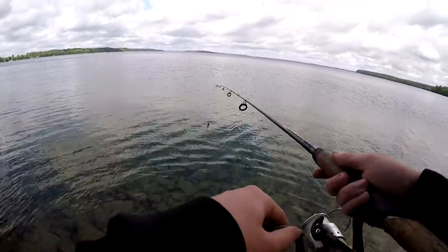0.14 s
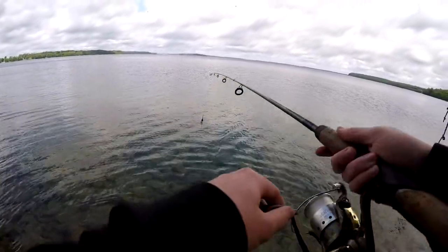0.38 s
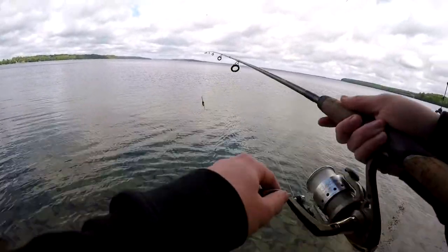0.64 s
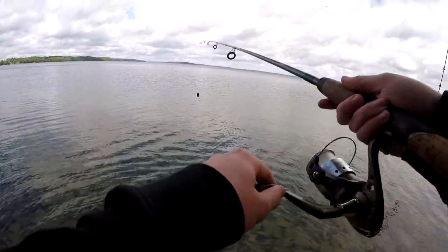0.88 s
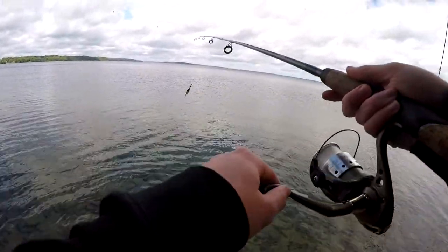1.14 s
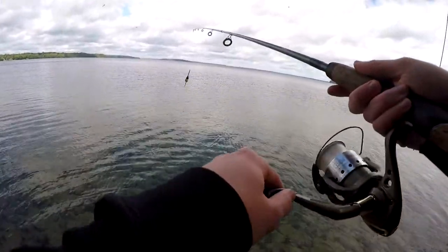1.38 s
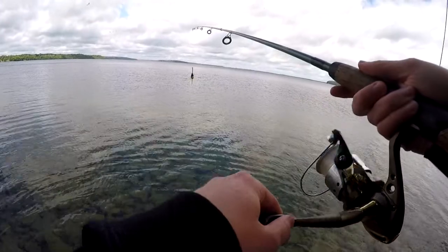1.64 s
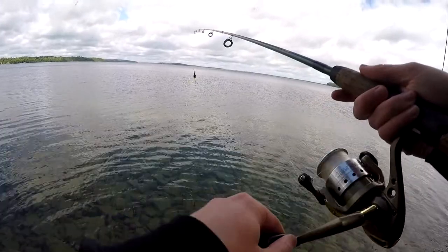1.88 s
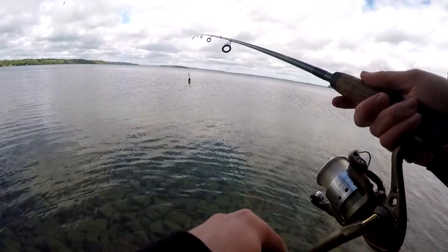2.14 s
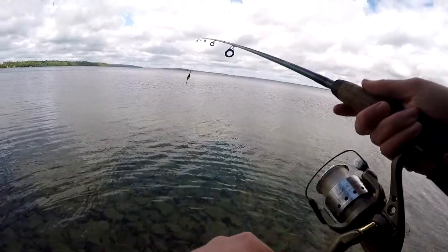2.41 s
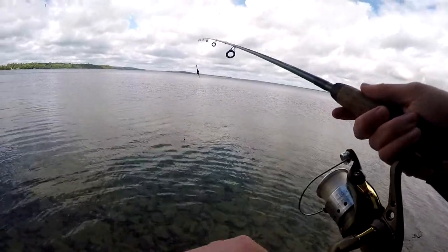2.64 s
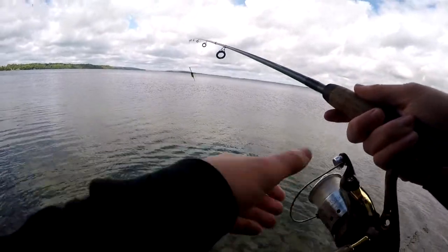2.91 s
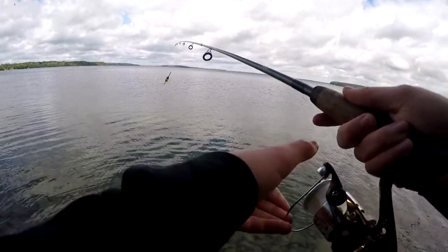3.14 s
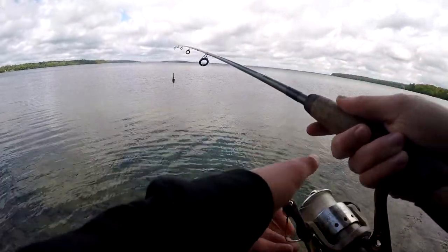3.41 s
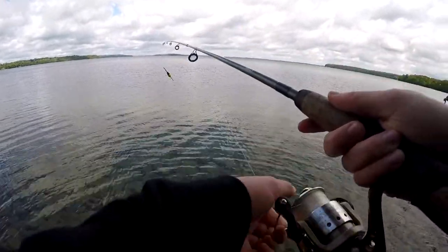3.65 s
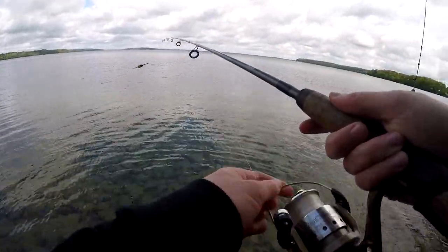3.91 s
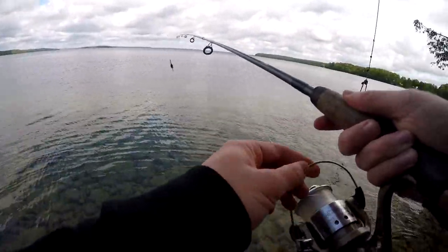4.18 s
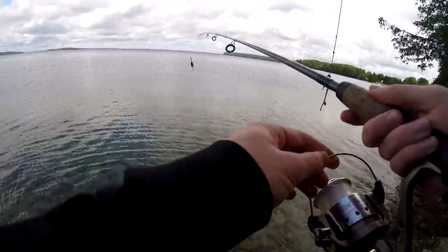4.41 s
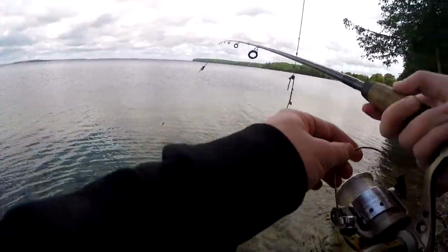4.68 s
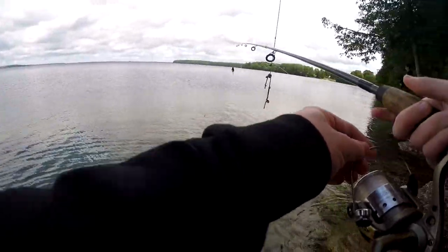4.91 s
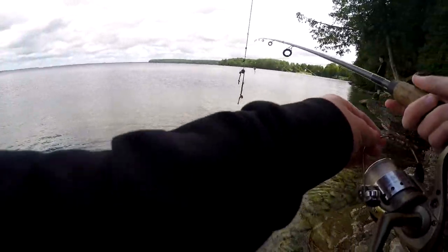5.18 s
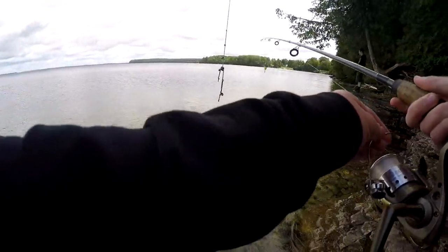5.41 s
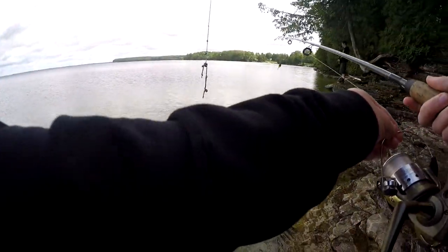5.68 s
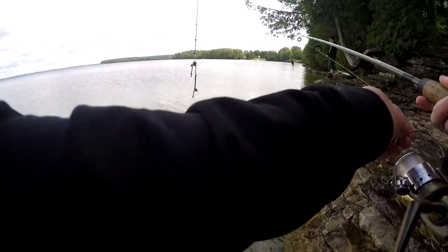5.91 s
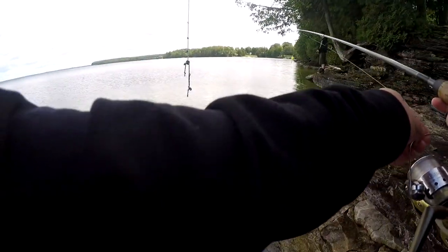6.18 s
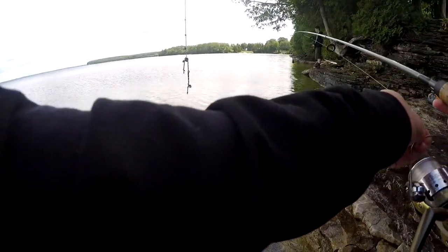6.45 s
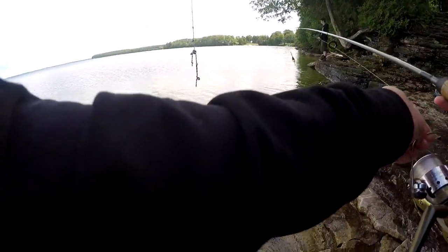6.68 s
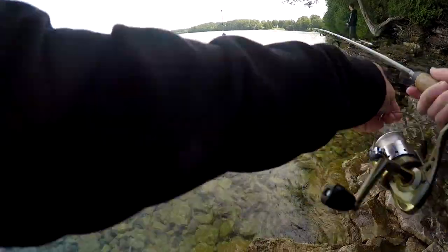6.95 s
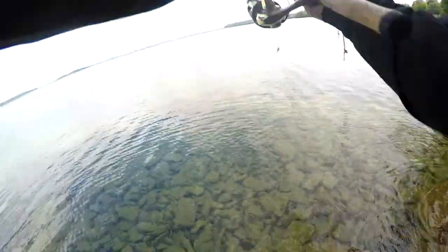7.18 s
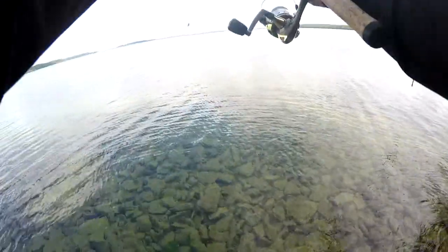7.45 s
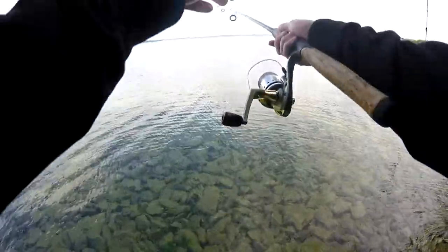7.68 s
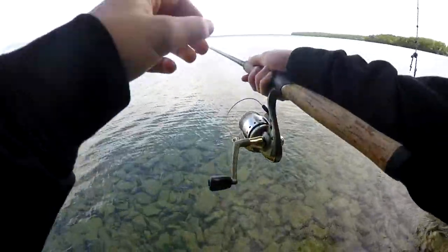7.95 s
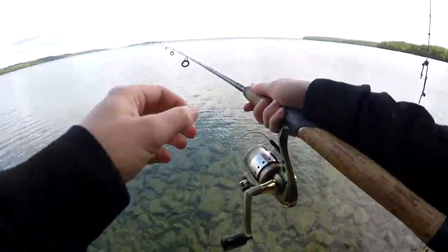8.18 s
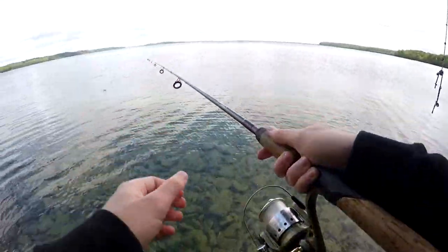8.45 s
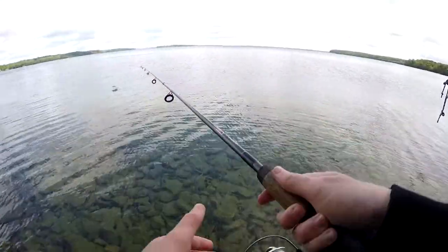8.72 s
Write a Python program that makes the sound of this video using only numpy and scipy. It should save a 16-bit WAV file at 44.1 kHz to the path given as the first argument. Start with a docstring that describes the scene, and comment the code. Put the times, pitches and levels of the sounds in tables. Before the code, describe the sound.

Outdoors at a calm lake shore, but very close and boxy, in mono, from a sealed case on the angler's chest. Steady low hiss and a deep heartbeat, about two beats a second, run underneath throughout. From 0 to 2.4 s winding gives only faint cloth rub and sparse hollow ticks, one clear at 0.3 s. Around 2.5 to 3.7 s knocks cluster and sleeves scrape softly; a tiny thin wire click comes at 4.3 s. Grainy rustling swells from 5 to 5.9 s with many ticks, then eases by 6.5 s. At 7.1 to 7.35 s the cast bursts out: loud smooth swish, deep thump, bright thin clicks, strap shuffle and low sway. Rustling continues in waves, with a dull bump at 7.9 s and two hollow knocks near 8.2 s, then settles into softer rubbing until the end near 9 s.

```python
"""A quiet lake shore: an angler winds in, opens the reel, swings back and casts, heard from a sealed case
on the chest. Sleeves and straps rub it: hiss, puffs and snaps that make its walls ring as damped modes.
Fast sleeves add a swish of coloured noise; knocks ring the walls, thin clicks and dull bumps stand apart.
The harness shuffles and sways as low noise, strongest around the cast. The wearer's heart thuds
underneath as sinking low tones, over the steady hiss of the recorder."""
import sys
import numpy as np
from scipy import signal
from scipy.fft import rfft, irfft, next_fast_len
from scipy.io import wavfile
from scipy.ndimage import uniform_filter1d

SR = 44100
rng = np.random.default_rng(int(sys.argv[2]) if len(sys.argv) > 2 else 0)


def persist_wave(psi):
    """Save psi, clipped to +-1, as 16-bit WAV."""
    counts = np.round(np.clip(psi, -1, 1) * 32767).astype(np.int16)
    wavfile.write(sys.argv[1], SR, np.atleast_2d(counts).T)


def volts_from_db(level):
    """Convert decibel levels to linear amplitude ratios."""
    exponent = np.asarray(level, float) / 20
    return 10 ** exponent


N = 389403  # length in samples

FAST_DB = -42  # cloth level of a fast arm movement, the reference for swish and shuffle


def evened(x):
    """Brings a signal to an rms of 1."""
    return x / np.sqrt(np.mean(x ** 2) + 1e-20)


def add(mix, s, sound):
    """Lays a sound into the mix from s seconds on, cut off at the end."""
    part = mix[round(s * SR):][:len(sound)]
    part += sound[:len(part)]


def coloured(x, points):
    """Filters x by a table of (f/Hz, level/dB), joined along a log frequency axis."""
    size = next_fast_len(len(x))
    f, db = np.transpose(points)
    hz = np.fft.rfftfreq(size, 1 / SR)
    gain_db = np.interp(np.log(hz + 1), np.log(f + 1), db)
    return irfft(rfft(x, size) * volts_from_db(gain_db), size)[:len(x)]


def ring(x, hz, width):
    """One damped mode with steep flanks, from a doubled pole; gain 1 at its centre."""
    r = np.exp(-np.pi * width / SR)
    pole = [1, -r * np.exp(2j * np.pi * hz / SR)]
    return 2 * signal.lfilter([(1 - r) ** 2], np.convolve(pole, pole), x).imag


def walls(drive, favour_db):
    """The case answers a force with all its modes; favour_db weights a mode by its octave above 1 kHz."""
    # ringing modes of the case walls: (f/Hz, width/Hz, level/dB)
    modes = [(515.5, 146, -5.5), (656, 227, -3), (1020, 386, 1.5), (1202, 380, 2), (1683, 330, -7),
             (2043, 310, -2), (2303, 343, 2), (3117, 440, -5), (3515, 204, -9.5), (3837, 386, -6),
             (4390, 630, -12), (5300, 510, -13.5), (6020, 940, -16.5), (6800, 720, -24), (7700, 900, -30.5),
             (10500, 880, -31), (12700, 2000, -36)]
    out = 0
    for k, (hz, width, db) in enumerate(modes):
        sign = (-1) ** k  # neighbouring modes in opposite polarity
        force = drive * volts_from_db(db + favour_db(np.log2(hz / 1000)))
        out = out + sign * ring(force, hz, width)
    return out


def swells(s, rise, fall, db):
    """Power over time of each movement, every 64 samples: up to its peak and away again."""
    s, rise, fall, db = (np.asarray(v)[:, None] for v in (s, rise, fall, db))
    lag = np.arange(0, N + 64, 64) / SR - s
    ends_db, squareness = -9, 1.48  # level one rise or fall from the peak; flatness of the top
    return volts_from_db(db + ends_db * abs(lag / np.where(lag < 0, rise, fall)) ** squareness) ** 2


def every_sample(x):
    """Joins values 64 samples apart by straight lines."""
    return np.interp(np.arange(N), np.arange(len(x)) * 64, x)


def movement():
    """Level and brightness of the cloth: the strokes add up in power over the resting level."""
    # arm movements that drag cloth over the case, brightness as a tilt:
    # (peak t/s, rise/s, fall/s, peak level/dB, brightness/dB per octave)
    strokes = [(0.42, 0.23, 0.33, -67, -0.5), (0.78, .1, 0.14, -68.5, -1.5), (1.2, .2, .12, -75, 4),
               (1.74, .2, .3, -69, -1), (2.33, 0.19, .07, -66, 0), (2.51, 0.14, 0.11, -65, -0.5),
               (2.72, 0.13, 0.21, -64.5, 0), (3.13, 0.13, 0.12, -57, -1.5), (3.52, 0.17, 0.14, -59, 0),
               (3.68, 0.051, 0.082, -63.5, -0.5), (3.97, 0.17, 0.51, -66, -1),
               (4.27, 0.067, 0.026, -65.5, 0), (4.4, 0.06, 0.092, -71, 1), (4.87, 0.32, 0.09, -65.5, 1),
               (5.1, 0.16, 0.23, -57, 0), (5.34, 0.22, 0.11, -50.5, 0.5), (5.52, 0.075, .13, -51, 0),
               (5.73, 0.13, .06, -53.5, 0), (5.87, 0.1, 0.14, -53.5, 0), (6.17, 0.11, 0.18, -58.5, 0.5),
               (6.33, 0.15, 0.19, -60.5, 0), (6.9, 0.13, 0.45, -58, -0.5), (7.189, 0.11, 0.094, -42, -0.5),
               (7.298, 0.08, 0.041, -41, -2.5), (7.45, 0.05, 0.066, -50, .5),
               (7.55, 0.093, 0.13, -45.5, 0.5), (7.71, 0.15, 0.034, -48, 0.5),
               (7.849, 0.072, 0.039, -47.5, 1), (7.96, 0.13, 0.12, -54.5, -.5),
               (8.12, 0.11, 0.16, -54.5, -1.5), (8.33, 0.29, 0.18, -52.5, -0.5),
               (8.54, 0.074, 0.062, -54, -0.5), (8.82, 0.26, .1, -55, 0)]
    still_db = -75
    s, rise, fall, db, bright = np.transpose(strokes)
    power = swells(s, rise, fall, db)
    total = power.sum(0) + volts_from_db(still_db) ** 2
    return every_sample(10 * np.log10(total)), every_sample(bright @ power / total)


def nudges(rows, under_db):
    """Short even swells added in power to a running level."""
    s, half, db = np.transpose(rows)
    power = every_sample(swells(s, half, half, db).sum(0))
    return 10 * np.log10(power + volts_from_db(under_db) ** 2)


def rub(catches_per_s=200, catch_s=0.0077, catch_db=-2, snaps_per_s=220, spread_db=4.0, snap_db=-3,
        smooth_above_db=-44):
    """Fibres slide with a hiss, catch in short puffs and snap free; fast sliding evens this out."""
    level_db, brightness = movement()
    catches = 1. * (rng.random(N) < catches_per_s / SR)
    puffs = signal.lfilter([1], [1, -np.exp(-1 / (catch_s * SR))], catches)
    snap_size = volts_from_db(spread_db * np.minimum(rng.exponential(1, N), 3))
    snaps = snap_size * (rng.random(N) < snaps_per_s / SR)
    grainy = 1 / (1 + volts_from_db(level_db - smooth_above_db) ** 2)
    hiss = rng.standard_normal(N) * (1 + grainy * volts_from_db(catch_db) * evened(puffs))
    hiss /= np.sqrt(uniform_filter1d(hiss ** 2, SR // 4))  # steady over a quarter second
    force = hiss + grainy * volts_from_db(snap_db) * evened(snaps)
    scale = np.sqrt(np.mean(walls(force, lambda octave: 0) ** 2))
    tilt = np.clip(brightness, -3, 3)  # dB per octave, pivoting at 2 kHz
    return walls(force * volts_from_db(level_db), lambda octave: tilt * (octave - 1)) / scale


def swish():
    """Sleeves sweeping past fast give a fuller, smoother rush than the slow rubbing."""
    # spectrum of the rush: (f/Hz, level per Hz/dB)
    swish_tone = [(250, -24), (400, 0), (700, -4), (1400, 0), (2700, -8.5), (4300, -6.5), (4900, -18.5),
                  (5500, -5.5), (6800, -17), (7300, -25), (12000, -45), (15000, -40)]
    # -47.5 dB at the fast level, growing 2 dB per dB of cloth level
    level_db = -47.5 + 2 * (movement()[0] - FAST_DB)
    return volts_from_db(level_db) * evened(coloured(rng.standard_normal(N), swish_tone))


def knocks(grit_s=0.0056, small_count=260, small_over_cloth_db=2.5, small_spread_db=6.5):
    """Each knock is a push and a little grit; where it lands decides which modes ring."""
    # single knocks on the case: (peak t/s, peak level/dB, favoured octave above 1 kHz, spread/octaves)
    single_knocks = [(0.0287, -51, 0, 1.5), (0.0755, -56, 2.1, 0.3), (0.3134, -50, 0.4, 3),
                     (0.3286, -40, 1.3, 1.4), (0.4059, -52, 1.1, 1.5), (0.4276, -55, 0.7, 0.3),
                     (0.6619, -53, 0.4, 2), (0.7704, -45, 1.3, 2), (1.8145, -50, 0.6, 1.3),
                     (2.0171, -48, -0.6, 3), (2.2294, -51, 1.8, 0.6), (2.4508, -50, 1.0, 2),
                     (2.5018, -45, 1.6, 0.9), (2.515, -44, 1.4, 1.3), (2.5541, -40, 0.4, 0.9),
                     (2.6165, -46, 0.2, 1.3), (2.6992, -38, -0.6, 1.1), (3.0625, -36, 0, 0.9),
                     (3.1461, -46, -0.8, 2), (3.1653, -48, 0.6, 3), (3.5197, -43, 0.8, 0.9),
                     (3.5289, -46, 0.4, 2), (3.6775, -43, 1.2, 3), (3.6861, -44, 0, 3),
                     (4.3247, -48, 0.4, 0.9), (4.5164, -47, -0.8, 1.4), (5.2755, -39, 1.2, 1.3),
                     (5.3449, -41, 1.4, 1), (5.4598, -42, 1.0, 1.3), (5.577, -41, 1.2, .9),
                     (5.6165, -39, 1.4, 2), (5.8082, -38.5, 1.2, 0.9), (6.1365, -40.5, 0.6, 1.3),
                     (6.1595, -46, 0.8, 3), (6.1837, -42, 0.2, 2), (6.3, -39, 0.6, 1.3),
                     (6.366, -42, 1.0, 1.3), (7.3564, -43, 1.4, 0.9), (7.4222, -46, 2.0, 0.9),
                     (8.2143, -38, 0.6, 0.9), (8.2621, -37, 0.4, 1.3)]
    t = np.arange(300) / SR
    # scattered ticks, a little louder than the cloth and rising with it
    when, size, place, width = rng.random((small_count, 4)).T
    at = .02 + when * (N / SR - .1)
    cloth_db = movement()[0][(at * SR).astype(int)]
    small_db = cloth_db + small_over_cloth_db + small_spread_db * size
    rows = single_knocks + list(zip(at, small_db, 2.4 * place, .4 + 1.6 * width))
    rough = rng.standard_normal((len(rows), len(t)))
    out = np.zeros(N)
    for (s, db, centre, octaves), grain in zip(rows, rough):
        push = t == 0
        grit = volts_from_db(-25) * grain * np.exp(-t / grit_s)
        force = np.pad(push + grit, (0, 1500))  # room to ring out
        tick = walls(force, lambda octave: -6 * ((octave - centre) / octaves) ** 2)
        add(out, s - abs(tick).argmax() / SR, volts_from_db(db) * tick / abs(tick).max())
    return out


def snicks():
    """Thin clicks of wire and line through the air: bright noise bursts that bypass the case's ringing."""
    # clicks, each swelling for half its length: (start t/s, peak level/dB, length/s)
    clicks = [(4.2785, -48.5, 0.0022), (4.2834, -53, 0.002), (7.3114, -40, 0.0022), (7.3155, -41, 0.0022),
              (7.354, -44, 0.0018), (7.3624, -63, 0.002)]
    # spectrum of a click: (f/Hz, level/dB)
    click_tone = [(1000, -20), (3500, 10), (4400, 12), (6000, 4), (8500, -1), (12000, 0), (14000, -7)]
    t = np.arange(600) / SR
    out = np.zeros(N)
    for (s, db, length), grain in zip(clicks, rng.standard_normal((len(clicks), len(t)))):
        burst = coloured(grain, click_tone) * t / length * np.exp(1 - 2 * t / length)
        add(out, s, volts_from_db(db) * burst / abs(burst).max())
    return out


def bumps():
    """Dull bumps against the harness: a softly starting sine that dies within a few cycles."""
    # bumps, level before onset and decay: (start t/s, level/dB, f/Hz, 60 dB decay/s)
    dull_bumps = [(0.327, -47, 115, 0.059), (2.693, -42, 82, .05), (4.516, -44, 124, 0.057),
                  (7.269, -21, 24.3, 0.26), (7.883, -27.5, 240, 0.033), (8.265, -32.5, 108, 0.082)]
    t = np.arange(6000) / SR
    out = np.zeros(N)
    for s, db, hz, t60 in dull_bumps:
        onset = 1 - np.exp(-t / 0.0042)
        add(out, s, -volts_from_db(db - 60 * t / t60) * np.sin(2 * np.pi * hz * t) * onset)
    return out


def harness(lump_s=0.059):
    """Low shuffle of the straps, the ring of the mount when shaken hard, and the slow sway."""
    # spectra of shuffle and sway: (f/Hz, level per Hz/dB)
    shuffle_tone = [(35, -6.5), (60, 0), (90, -4.5), (150, -9), (205, -15), (265, -16), (330, -26),
                    (400, -35), (600, -54.5)]
    sway_tone = [(5, -34), (12, 2), (20, -9), (32, -3), (45, -15.5), (65, -22.5), (90, -35), (200, -83)]
    # moments when the low shuffle swells: (peak t/s, half length/s, peak level/dB)
    shuffle_swells = [(0.69, 0.11, -63), (1.7, 0.093, -59), (3.17, 0.078, -55), (3.96, .05, -61),
                      (4.15, 0.044, -58), (4.38, 0.036, -57), (4.52, 0.025, -58), (5.85, 0.31, -57.5),
                      (6.32, 0.032, -52.5), (6.81, 0.047, -60), (6.93, 0.069, -55.5), (7.22, 0.12, -40.5),
                      (7.34, 0.043, -38.5), (7.6, 0.32, -53.5), (7.89, .02, -44), (8.26, 0.061, -55),
                      (8.51, .05, -51.5)]
    # lurches of the case on the chest, during and after the cast: (peak t/s, half length/s, peak level/dB)
    lurches = [(7.16, 0.027, -52), (7.29, 0.072, -33.5), (7.39, 0.084, -30), (7.55, 0.092, -36),
               (7.77, 0.088, -39.5), (7.9, 0.077, -38.5), (8.2, 0.64, -49)]
    # ring of the case on its straps, level against the shuffle at its strongest:
    # (f/Hz, width/Hz, level/dB, extra level/dB per dB of shuffle)
    mount_ring = (123.1, 51, 0.85, 0.36)
    shuffle, shake, sway, lumps = rng.standard_normal((4, N))
    for _ in range(2):
        lumps = uniform_filter1d(lumps, round(lump_s * SR))
    # the harness follows the arms by 0.49 dB per dB, unevenly by 2 dB rms
    follow_db = -51.5 + 0.49 * (movement()[0] - FAST_DB) + 2 * evened(lumps)
    shuffle_db = nudges(shuffle_swells, follow_db)
    hz, width, db, extra = mount_ring
    mount = volts_from_db(db + extra * (shuffle_db - shuffle_db.max())) * evened(ring(shake, hz, width))
    straps = volts_from_db(shuffle_db) * (evened(coloured(shuffle, shuffle_tone)) + mount)
    sway_db = nudges(lurches, -58)  # over the sway at rest
    return straps + volts_from_db(sway_db) * evened(coloured(sway, sway_tone))


def heart(start_hz=42, settle_hz=15, glide_s=0.057, first_s=.16, second_s=.12, second_after_s=.24):
    """Each heart sound is a few cycles of the chest wall, sinking in pitch; the second is shorter."""
    # heartbeats: (start t/s, first sound level/dB, second sound level/dB)
    beats = [(0.124, -42, -49), (0.645, -46, -56), (1.181, -44.5, -47), (1.666, -45.5, -50),
             (2.195, -42.5, -52), (2.701, -41.5, -46.5), (3.213, -46, -50.5), (3.732, -44, -53),
             (4.238, -42.5, -47.5), (4.733, -44, -47.5), (5.242, -46.5, -52), (5.769, -43.5, -46.5),
             (6.277, -43.5, -45.5), (6.786, -43.5, -52), (7.301, -47, -41), (7.814, -44, -44.5),
             (8.345, -42, -45)]
    out = np.zeros(N)
    for s, first_db, second_db in beats:
        for at, db, length in (s, first_db, first_s), (s + second_after_s, second_db, second_s):
            t = np.arange(round(length * SR)) / SR
            pitch = settle_hz + (start_hz - settle_hz) * np.exp(-t / glide_s)
            shape = np.sin(np.pi * (t / length) ** 0.53) ** 0.43
            add(out, at, volts_from_db(db) * shape * np.sin(2 * np.pi * np.cumsum(pitch) / SR))
    return out


def recorder_hiss():
    """Steady noise of the recorder, strongest in the lows."""
    # spectrum of the hiss: (f/Hz, level per Hz/dB)
    hiss_tone = [(59, -20), (100, -7.5), (384, -14), (1100, -17.5), (1860, -17), (2240, -21), (2600, -18.5),
                 (3960, -20), (8440, -26), (13400, -29), (15200, -32.5)]
    return volts_from_db(-65.5) * evened(coloured(rng.standard_normal(N), hiss_tone))


def scene():
    """Sums cloth, knocks, clicks, bumps, harness and heart on one channel."""
    return (rub() + swish() + knocks() + snicks() + bumps() + harness() + heart())[None]


def low_pass(x):
    """Removes everything above the highest recorded frequency."""
    return signal.sosfilt(signal.butter(12, 15500, fs=SR, output="sos"), x)


def record(dry):
    """The recorder adds its hiss and cuts the band steeply at 15.3 kHz."""
    edge = signal.firwin(1023, 15300, window=("kaiser", 9), fs=SR)
    mix = signal.oaconvolve(dry + recorder_hiss(), edge[None], "same")
    return low_pass(mix)


dry = scene()
out = record(dry)
persist_wave(out)
```